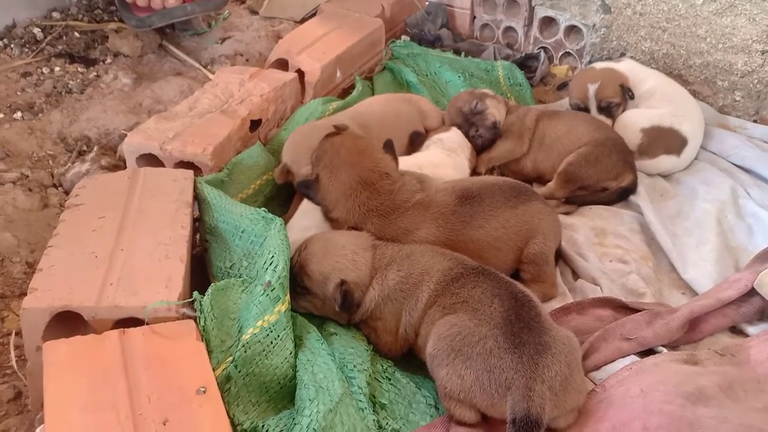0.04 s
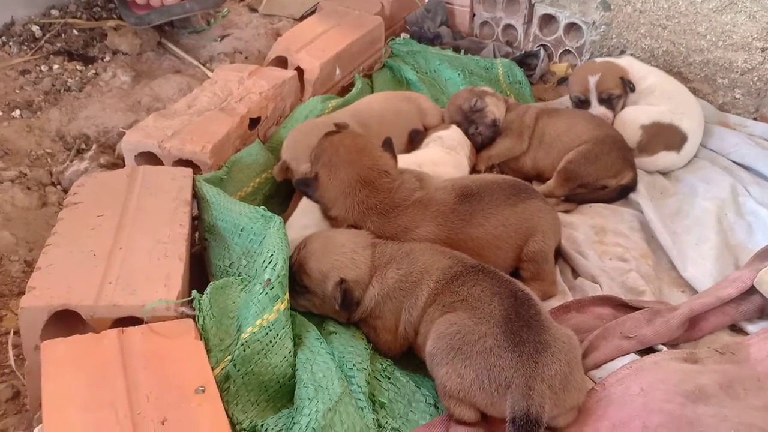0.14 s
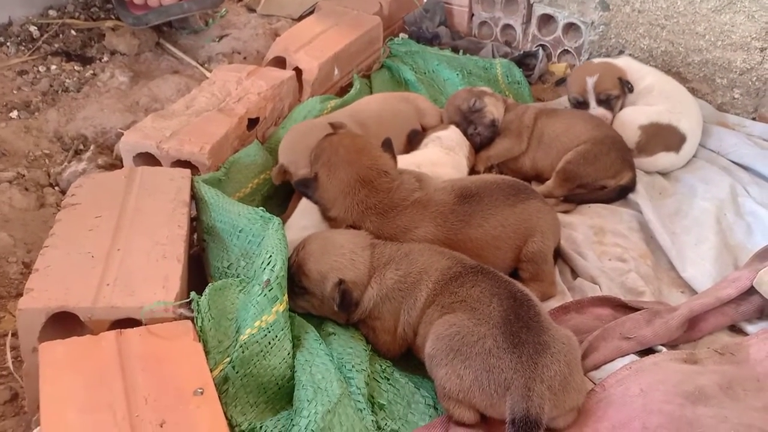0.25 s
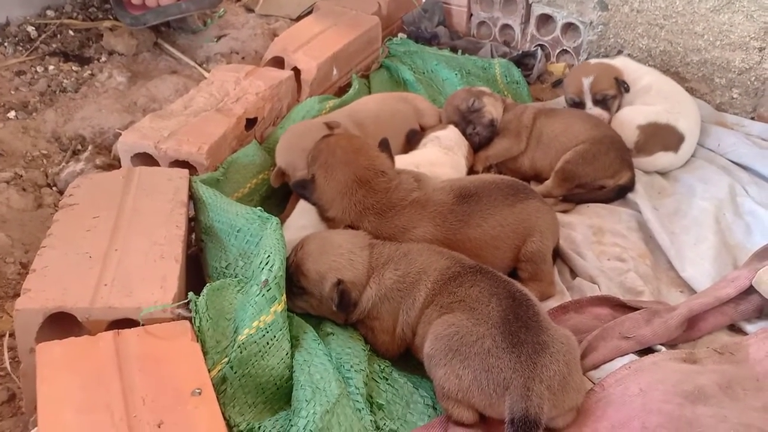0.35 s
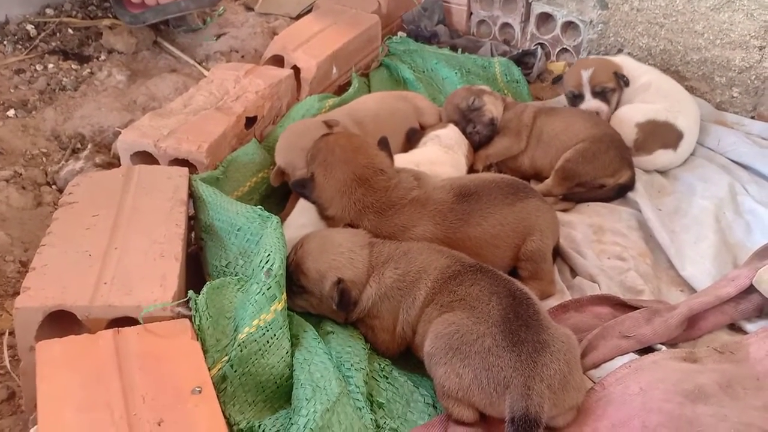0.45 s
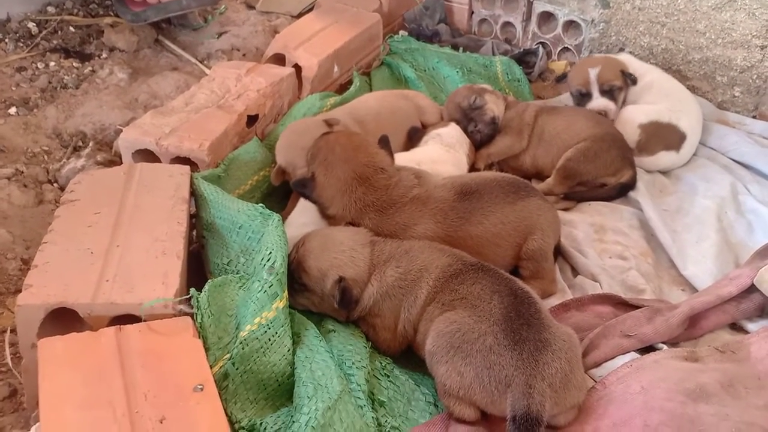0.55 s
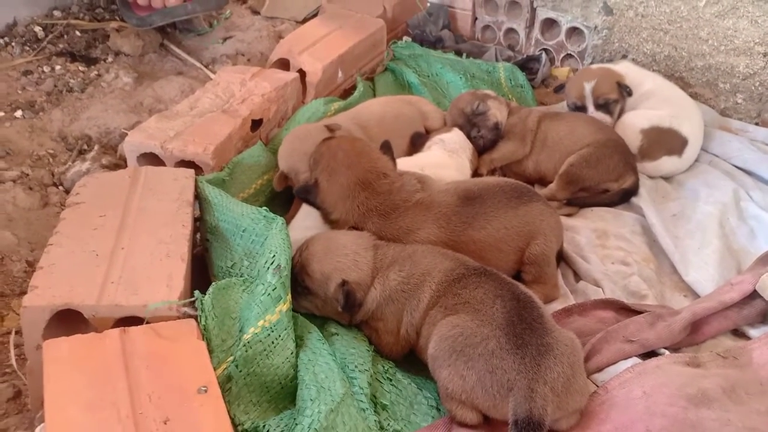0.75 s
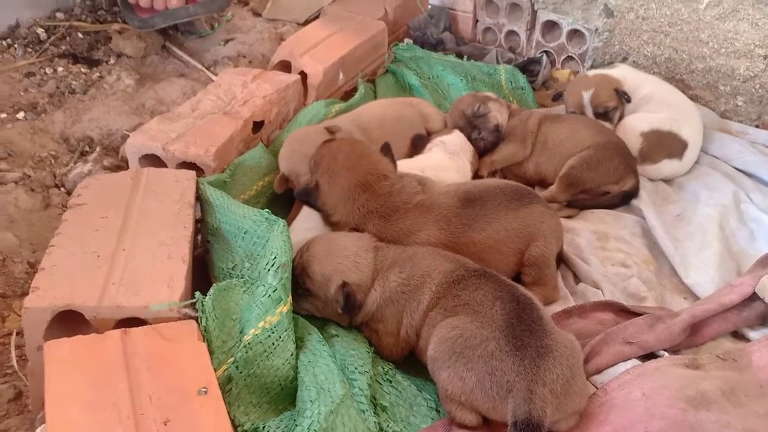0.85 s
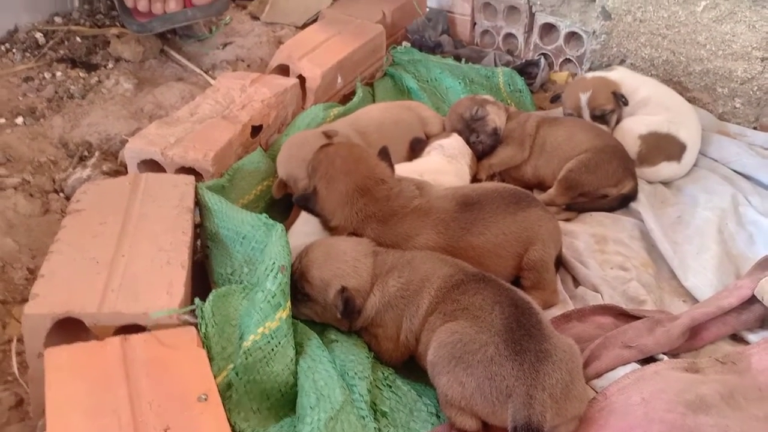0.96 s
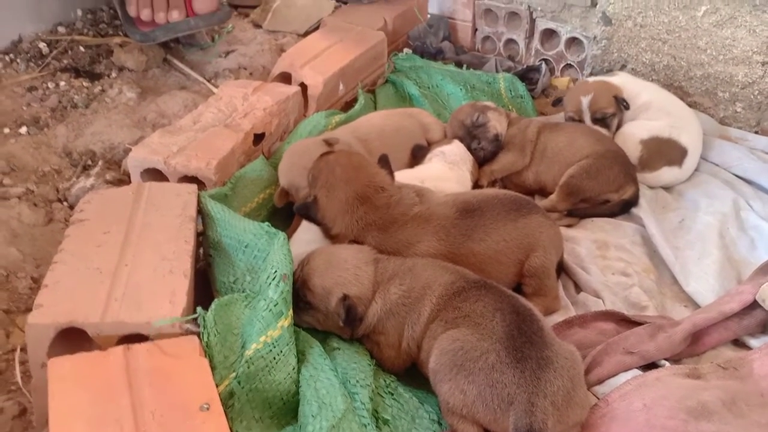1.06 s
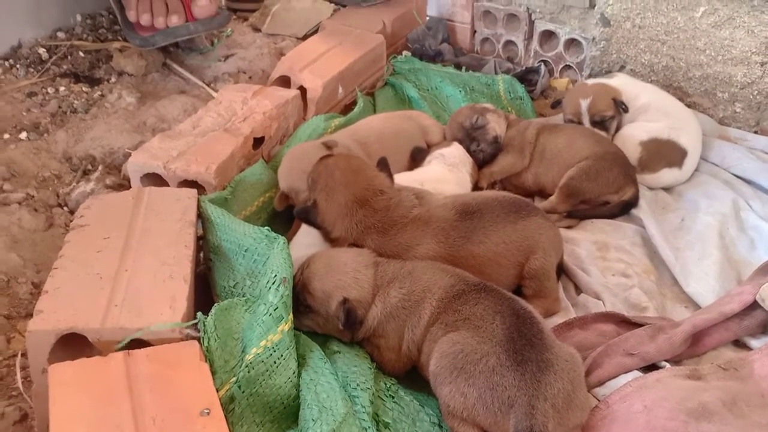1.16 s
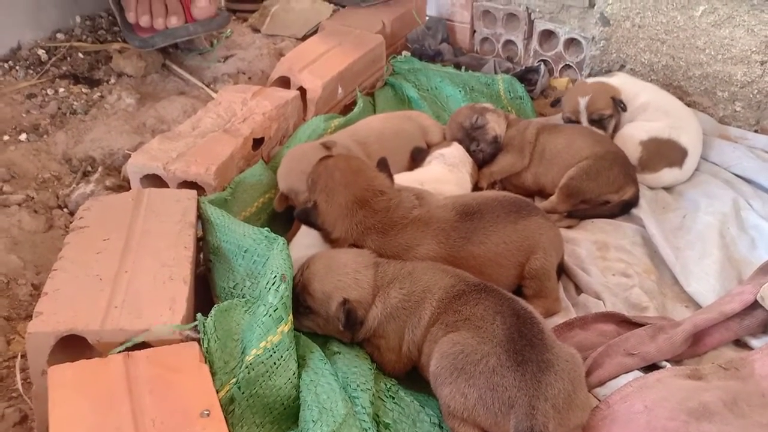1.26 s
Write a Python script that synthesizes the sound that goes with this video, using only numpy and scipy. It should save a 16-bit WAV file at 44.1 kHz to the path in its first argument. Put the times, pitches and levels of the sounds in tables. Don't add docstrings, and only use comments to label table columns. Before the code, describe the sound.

A young puppy gives a short squeaky whimper, then a lower, rougher one and a weak throat creak, close to the microphone outdoors, with light wind bumps, another pup's faint whine and distant traffic rumble.

```python
import sys
import numpy as np
from scipy import signal
from scipy.io import wavfile
from scipy.ndimage import uniform_filter1d

SR = 44100
rng = np.random.default_rng(int(sys.argv[2]) if len(sys.argv) > 2 else 0)


def wav_out(sig):
    wavfile.write(sys.argv[1], SR, np.round(np.clip(np.atleast_2d(sig).T, -1, 1) * 32767).astype(np.int16))


def voltage_ratio(level):
    return 10 ** (np.asarray(level, float) / 20)


N = 57330


def in_time(rows):
    s, *columns = np.transpose(rows)
    return [np.interp(np.arange(N) / SR, s, c) for c in columns]


def at_hz(points, hz):
    table_hz, value = np.transpose(points)
    return np.interp(np.log(hz), np.log(table_hz), value)


def drift(rate_hz):
    r = np.exp(-2 * np.pi * rate_hz / SR)
    slow = signal.lfilter([1], [1, -2 * r, r * r], rng.standard_normal(N + SR))[SR:]
    return (slow - slow.mean()) / slow.std()


def cut(x, hz, kind, order):
    return signal.sosfilt(signal.butter(order, hz, kind, fs=SR, output="sos"), x)


def bump(s, half_ms):
    t = np.arange(N) / SR
    return np.exp(-((t - s) * 1000 / half_ms) ** 2)


# start_s (centre), half_length_ms, pitch_hz, level_db
MOUTH_SHIFTS = [(.410, 7.4, 790, -29), (.38, 14, 1050, -0.5), (0.48, 33, 1320, -6.5), (0.68, 14, 1400, 1),
                (.815, 14, 1790, 0), (0.858, 33.5, 1270, 5.5), (0.852, 21, 390, -7), (0.851, 29, 2200, -9),
                (0.887, 4.7, 850, -12.5), (0.888, 9.2, 1480, -22), (0.89, 14, 1940, 2),
                (.85, 38, 3070, -10), (.323, 11, 600, -6.5), (0.37, 15, 700, -8.5),
                (0.2604, 9.2, 2020, 0.5), (0.28, 15, 1870, -4), (0.33, 8.8, 4300, 0), (.89, 10, 1200, 2.5),
                (0.33, 6.8, 2480, 3)]


def mouthing(hz):
    width_hz = 230
    return sum(db * bump(s, ms) * np.exp(-((hz - f) / width_hz) ** 2) for s, ms, f, db in MOUTH_SHIFTS)


def resonance(source, hz, width_hz):
    r = np.exp(-np.pi * width_hz / SR)
    poles = [1, -2 * r * np.cos(2 * np.pi * hz / SR), r * r]
    return signal.lfilter((1 - r * r) / 2 * np.array([1, 0, -1]), poles, source)


def whimper(rows, throat, glide_ms, spread, rasp, hoarse, leak_db):
    jitter, shimmer_db, breath_db, edge_ms = 0.005, 0.7, -32.5 + 14.5, 1.1
    hz, db, half, dull_db = in_time(rows)
    half = np.clip(half, 0, 1)
    hz = uniform_filter1d(hz, size=int(glide_ms * SR / 1000))
    scatter = jitter * drift(40) + rasp * half ** 2 * drift(180)
    phase = np.pi * np.cumsum(hz * (1 + scatter)) / SR
    pulses = 0
    for k in range(1, 21):
        harmonic = k / 2
        level_db = shimmer_db * drift(13.3) + mouthing(harmonic * hz) - dull_db * (harmonic - 1.5)
        share = half if k % 2 else 1
        pulses = pulses + share * voltage_ratio(level_db) * np.cos(k * phase + spread * harmonic ** 2)

    t = np.arange(N) / SR
    gate = np.clip(np.minimum(t - rows[0][0], rows[-1][0] - t) * 1000 / edge_ms, 0, 1)
    breath = (voltage_ratio(breath_db) + 3 * hoarse * half) * rng.standard_normal(N)
    source = voltage_ratio(db) * gate * (pulses + breath) + 1e-18
    voice = 0
    for sign, (f, width_hz, level_db) in zip([-1, 1, 1, -1], throat):
        voice = voice + sign * voltage_ratio(level_db) * resonance(source, f, width_hz)
    leak = cut(source * (1 + 0.5 * rng.standard_normal(N)), [3300, 4600], "band", order=3)
    return cut(voice, 2780, "low", order=20) + voltage_ratio(leak_db) * leak


# start_s, pitch_hz, level_db, doubling_share (0-1), dulling_db per harmonic
FIRST_CALL = [
    (.2325, 700, -60, 0.3, 0),
    (.2355, 684.3, -42, 0.11, 0),
    (.290, 630.7, -36, 0, 3),
    (.330, 587.4, -39.5, 0.01, 2),
    (.376, 697.2, -42.5, 0, 1.5),
    (.408, 639.8, -42, 0.07, 3),
    (.430, 690, -47, 0.25, 0),
    (.446, 720, -54, 1, 0),
    (.468, 716, -58, 1, 4),
]
# pitch_hz, width_hz, level_db
FIRST_THROAT = [(713, 310, 1.5), (1217, 190, 12.5), (1916, 560, 11), (2400, 420, 5)]


def first_whimper():
    return whimper(FIRST_CALL, FIRST_THROAT, glide_ms=22.7, spread=0.0, rasp=0.012, hoarse=0.5, leak_db=-26)


# start_s, pitch_hz, level_db, doubling_share (0-1), dulling_db per harmonic
SECOND_CALL = [
    (.7935, 450.6, -71, 0.65, -5.5),
    (.798, 458.7, -44, 0.49, 1.5),
    (.803, 456.5, -44, 0.02, 1.5),
    (.836, 430, -43, 0.08, 0),
    (.877, 422.3, -43, 0.11, 1),
    (.882, 402.5, -39.5, 0.64, 2.5),
    (.891, 388.5, -45, 0.05, 0),
    (.903, 430, -47, 0.03, 2),
    (.927, 518, -65, 0.4, 24),
]
# pitch_hz, width_hz, level_db
SECOND_THROAT = [(430, 330, -0.5), (1147, 178, 9.5), (1906, 610, 3.5), (2537, 72, 1.5)]


def second_whimper():
    return whimper(SECOND_CALL, SECOND_THROAT, glide_ms=2.5, spread=0.5, rasp=0.04, hoarse=1.2, leak_db=-38)


def squeak():
    start_s, pitch_hz, level_db = 0.2325, 1195, -23.5
    grow_db_per_s, fade_db_per_s = 2490, 2000
    octave_db, octave_early_s = -17, 0.0018
    t = np.arange(N) / SR - start_s

    def swell(t, fade):
        return voltage_ratio(level_db + np.maximum(np.minimum(grow_db_per_s * t, -fade * t), -200))

    phase = 2 * np.pi * pitch_hz * t
    octave = swell(t + octave_early_s, 2 * fade_db_per_s) * np.sin(2 * phase)
    return swell(t, fade_db_per_s) * np.sin(phase) + voltage_ratio(octave_db) * octave


def blip(s, hz, db, swing_ms):
    t = np.clip(np.arange(N) / SR - s, 0, None)
    u = np.minimum(t * 1000 / swing_ms, 60)
    return voltage_ratio(db) * u * np.exp(1 - u) * np.sin(2 * np.pi * hz * t)


# start_s, level_db, pitch_factor, brightness_db
FOLD_SNAPS = [
    (0.2033, -38, 0.96, 1),
    (0.4625, -43.5, 1.01, 2),
    (0.7949, -38, 0.856, 1.5),
    (1.1570, -41, 0.99, -2.5),
    (1.2191, -40, 0.95, 4.5),
    (1.2247, -41.5, 0.88, 0),
    (1.2280, -50, .97, -5),
    (1.2320, -44.5, 1.06, 2),
    (1.2350, -50.5, 1.06, 8),
    (1.2383, -53, 0.98, 6),
]
# pitch_hz, level_db, swing_ms (time to full swing)
THROAT_MODES = [(1151, 3.5, 1.6), (1975, -8.5, 1.22), (2530, -11.5, 1.5)]
# start_s, pitch_hz, level_db, swing_ms
MOUTH_GULPS = [
    (.466, 715, -49, 4.5),
    (.787, 390, -47, 2.5),
    (1.236, 465, -48, 3.8),
]


def snaps():
    out = 0
    for s, db, factor, bright_db in FOLD_SNAPS:
        for k, (hz, mode_db, swing_ms) in enumerate(THROAT_MODES):
            tilt_db = bright_db if k > 0 else 0
            out = out + blip(s, hz * factor, db - 3.5 + mode_db + tilt_db, swing_ms)
    return out + sum(blip(*row) for row in MOUTH_GULPS)


def ports(x):
    t = np.arange(N)

    def late(ms):
        return np.interp(t - ms * SR / 1000, t, x, left=0)

    out = np.array([x + 0.53 * late(0.56), voltage_ratio(-3) * (x + 0.6 * late(0.27))])
    notch_hz, notch_width_hz, notch_depth = 609, 110, 0.76
    peak = signal.iirpeak(notch_hz, notch_hz / notch_width_hz, fs=SR)
    out[1] -= notch_depth * signal.lfilter(*peak, out[1])
    for k, (ms, db) in enumerate([(7.3, -24), (13.1, -25), (23.7, -28)]):
        out[k % 2] += voltage_ratio(db) * late(ms)
    return out


def ring(s, db, hz, t60):
    click = np.full(N, 1e-18)
    click[int(s * SR)] = voltage_ratio(db)
    r, w = voltage_ratio(-60 / (t60 * SR)), 2 * np.pi * hz / SR
    return signal.lfilter([0, np.sin(w)], [1, -2 * r * np.cos(w), r * r], click)


# start_s, level_db, pitch_hz, sign
DULL_TICKS = [
    (.7760, -30.5, 620, 1),
    (1.0932, -33, 780, -1),
    (1.1505, -40, 800, -1),
]


def ticks():
    out = sum(sign * ring(s, db, hz, 4.5 / hz) for s, db, hz, sign in DULL_TICKS)
    return cut(out, 2600, "low", order=2) * voltage_ratio(np.array([[0], [-16]]))


def wind(puffs, rumble_db):
    lump_spread, lump_late_s, build_up, gust_db = 1.25, 0.0005, 0.22, 4.5
    lumps = 0
    for s, db, ms, sign in puffs:
        s, ms = s + lump_late_s, ms * lump_spread
        swell = bump(s - 2 * ms / 1000, 2 * ms)
        lumps = lumps + sign * voltage_ratio(db) * (bump(s, ms) - build_up * swell)
    rumble = cut(rng.standard_normal(N + SR), 162, "low", order=2)
    rumble = cut(rumble, 65, "high", order=3)[SR:]
    gusts = voltage_ratio(rumble_db + gust_db * drift(13.4)) * rumble / rumble.std()
    return 1.67 * cut(lumps + 1e-18, 72, "high", order=2) + gusts


# start_s (peak), level_db, width_ms, sign
LEFT_PUFFS = [
    (.654, -40, 2.47, 0.62),
    (1.096, -32.5, 0.89, 0.7),
    (1.113, -41.5, 1.3, 1),
    (1.126, -47, 2.3, 1),
]
# start_s (peak), level_db, width_ms, sign
RIGHT_PUFFS = [(.5912, -40, 1.0, -1), (.5935, -38, 1.1, 1), (.5962, -35, 1.3, -1), (.622, -24, 1.5, -1),
               (.9222, -35, 2.2, -1), (.9335, -34, 1.1, 1), (.9362, -27, 1.2, -1), (.9622, -32, 1.2, -1),
               (.9787, -23, 1.1, -1), (1.0057, -28, 1.7, -1), (1.0095, -34, 2.0, 1), (1.023, -29, 1.0, -1),
               (1.027, -29, 1.1, 1), (1.040, -28, 1.0, -1), (1.0505, -33, 1.4, -1)]
# start_s, left_level_db, right_level_db
BREEZE_LEVELS = [(0, -68, -64), (.4, -74, -60.5), (.6, -66.5, -57.5), (.8, -67, -58), (1.0, -65.5, -55),
                 (1.12, -73.5, -56.5), (1.3, -63, -48.5)]


def breeze():
    left_db, right_db = in_time(BREEZE_LEVELS)
    return np.array([wind(LEFT_PUFFS, left_db), wind(RIGHT_PUFFS, right_db)])


# start_s, pitch_hz, level_db
FAR_CALL = [(0, 559.6, -56.5), (.15, 520, -58), (.28, 477.2, -60.5), (.35, 540, -55.5), (.5, 497.6, -64.5),
            (.7, 516, -65), (.95, 460, -66.5), (1.05, 520.6, -50), (1.13, 568.4, -60.5), (1.2, 537, -60),
            (1.3, 498, -60)]


def far_whine():
    hz, db = in_time(FAR_CALL)
    phase = 2 * np.pi * np.cumsum(hz * (1 + 0.011 * drift(19))) / SR
    return voltage_ratio(db - 5.5 + 1.5 * drift(11)) * np.sin(phase)


# start_s (centre), half_length_ms, level_db
NOSE_PUFFS = [
    (0.214, 31, -64),
    (0.329, 9.1, -65.5),
    (0.797, 16, -66.5),
    (.843, 19, -69),
    (0.991, 8.7, -66.5),
    (1.155, 11, -69.5),
    (1.29, 13, -69),
]


def snuffles():
    level = sum(voltage_ratio(db) * bump(s, ms) for s, ms, db in NOSE_PUFFS)
    air = cut(rng.standard_normal((2, N)), [3430, 5200], "band", order=2)
    return level * air / air.std() * voltage_ratio(np.array([[-3], [3]]))


# pitch_hz, level_db per Hz
YARD_SPECTRUM = [(200, -8), (300, -10), (530, -7), (850, -10.5), (1600, -15.5), (2400, -10.5), (3200, -23),
                 (4900, -22)]
# pitch_hz, level_db per Hz
HISS_SPECTRUM = [(6000, -31), (8500, -33), (9600, -38), (10600, -34.5), (12000, -35.5), (13800, -34),
                 (15200, -38)]
# pitch_hz, likeness (0 unrelated, 1 alike)
PORT_LIKENESS = [(290, 1), (640, .55), (1400, 0), (3000, 0)]
# pitch_hz, left_minus_right_db
PORT_BALANCE = [(200, 1), (600, 0), (2400, 2.5), (4300, -6.5), (8000, -1.5), (12500, -0.5), (15000, -13.5)]


def yard():
    out, edges = 0, 190 * 2 ** np.arange(0, 6.5, 1 / 4)
    white = rng.standard_normal((2, 2, N))
    for k, (low, high) in enumerate(zip(edges, edges[1:])):
        mid, side = cut(white[k % 2], [low, high], "band", order=2)
        hz = np.sqrt(low * high)
        alike = np.clip(at_hz(PORT_LIKENESS, hz), -1, 1)
        pan_db = at_hz(PORT_BALANCE, hz) / 2
        level_db = at_hz(YARD_SPECTRUM + HISS_SPECTRUM, hz) + 0.65 * drift(18)
        pair = np.sqrt(1 + alike) * mid + np.sqrt(1 - alike) * side * [[1], [-1]]
        out = out + voltage_ratio(level_db) * voltage_ratio(np.array([[pan_db], [-pan_db]])) * pair
    return voltage_ratio(-61.5) * out / out.mean(axis=0).std()


def drone():
    low = cut(rng.standard_normal(N + SR), [75, 127], "band", order=2)[SR:]
    return voltage_ratio(-57) * low / low.std()


def scene():
    pup = first_whimper() + second_whimper() + squeak() + snaps()
    return ports(pup) + ticks() + breeze() + far_whine() + snuffles() + yard() + drone()


def top_cut(x):
    return signal.sosfilt(signal.butter(12, 15480, fs=SR, output="sos"), x)


def record(dry):
    loudness = uniform_filter1d(np.abs(cut(dry, 500, "high", order=2)), size=400, axis=1)
    white = rng.standard_normal(dry.shape)
    high_hash = cut(white, [12900, 15000], "band", order=2)
    low_hash = voltage_ratio(-6) * cut(white, [6800, 8600], "band", order=2)
    noisy = dry + voltage_ratio(-35) * loudness * (high_hash + low_hash)
    mix = cut(noisy, 15470, "low", order=30) + 0.0013
    return top_cut(mix)


dry = scene()
out = record(dry)
wav_out(out)
```